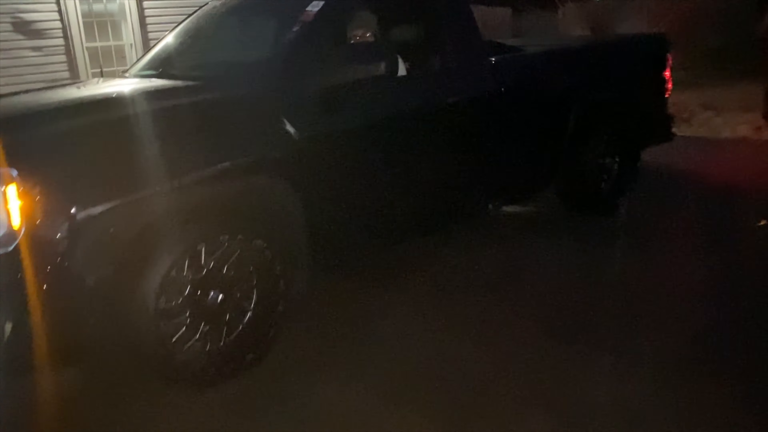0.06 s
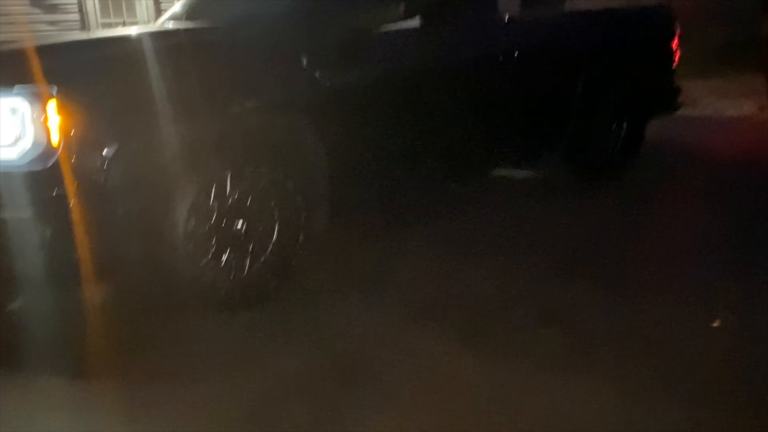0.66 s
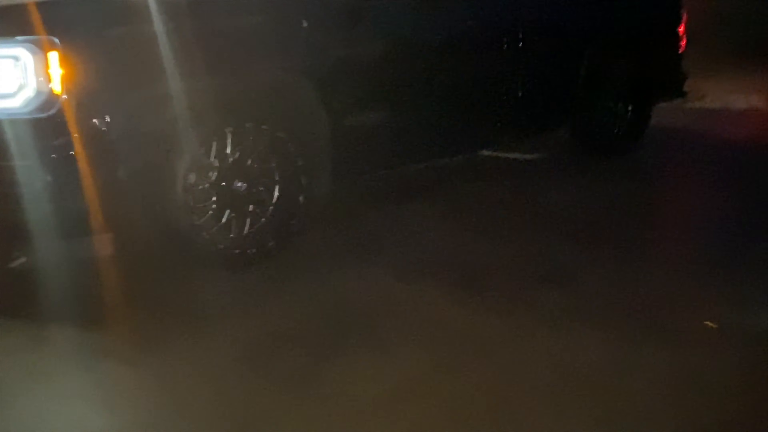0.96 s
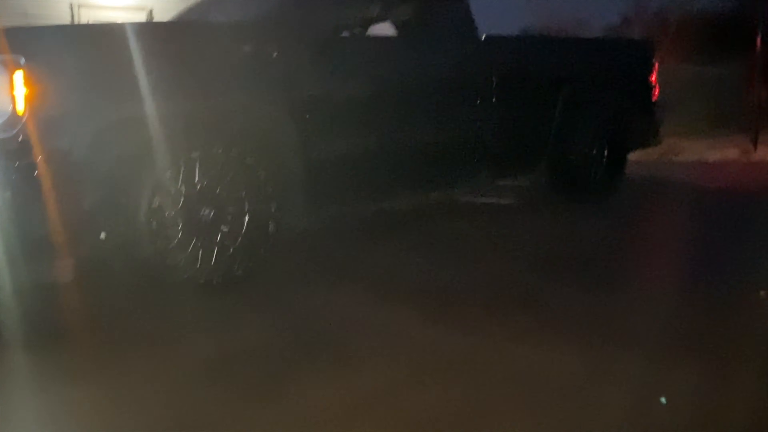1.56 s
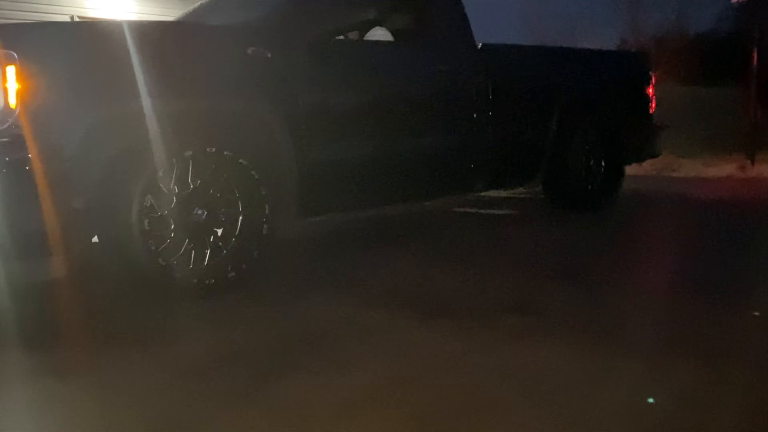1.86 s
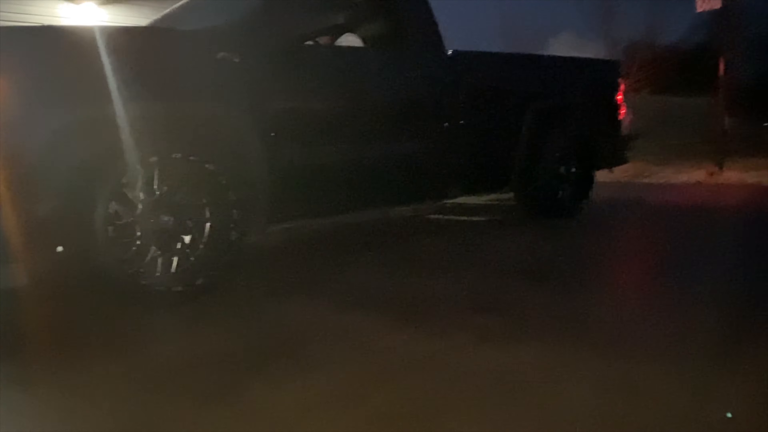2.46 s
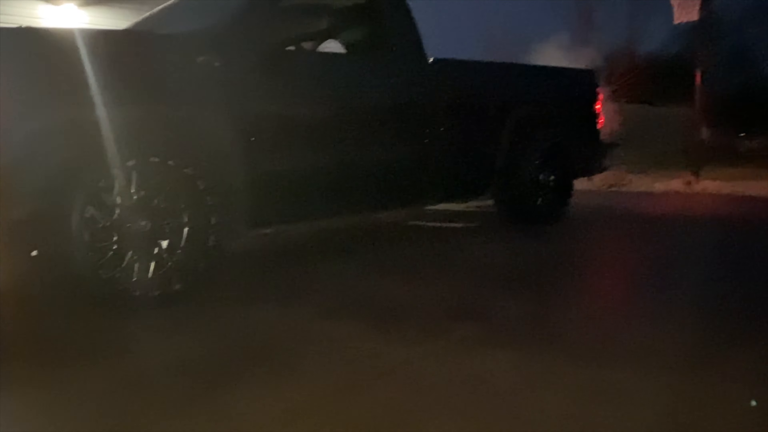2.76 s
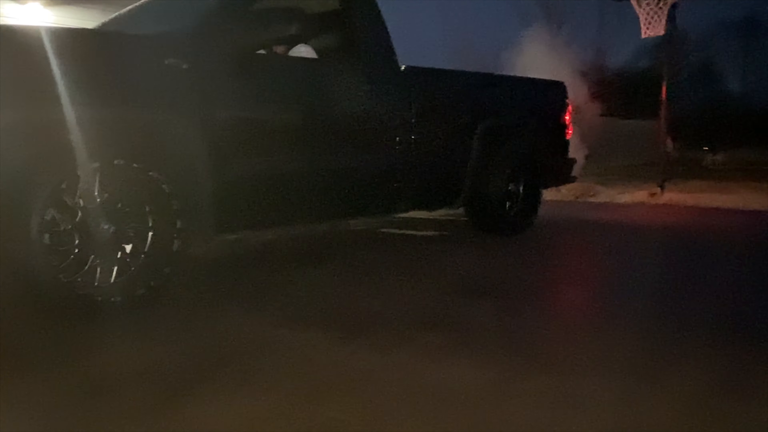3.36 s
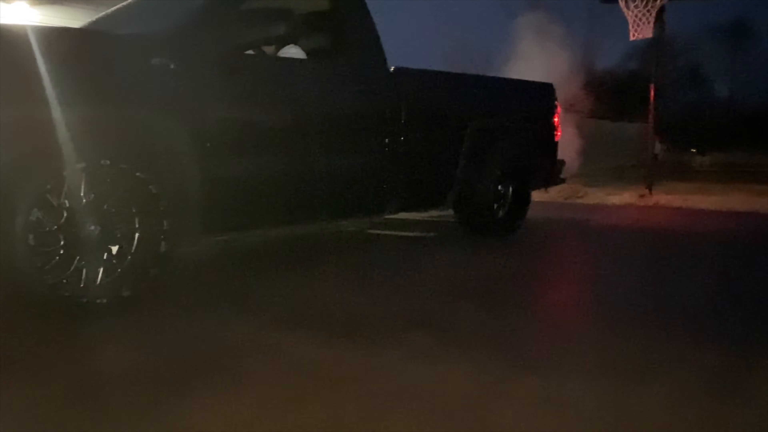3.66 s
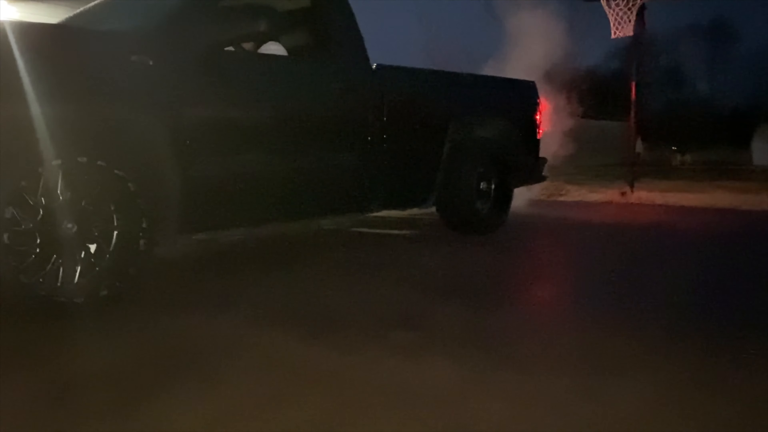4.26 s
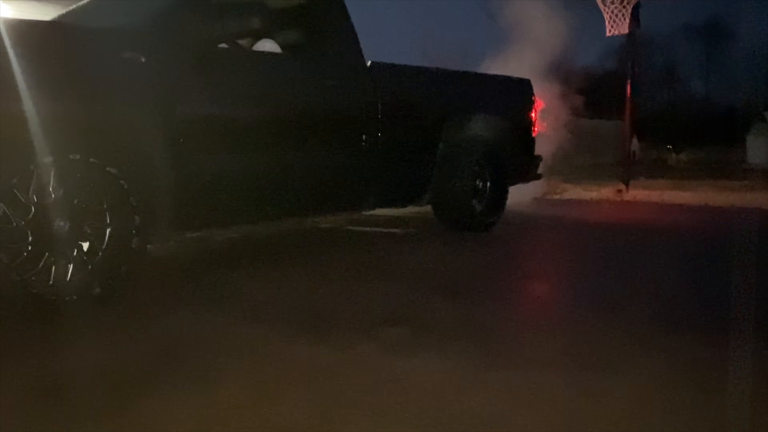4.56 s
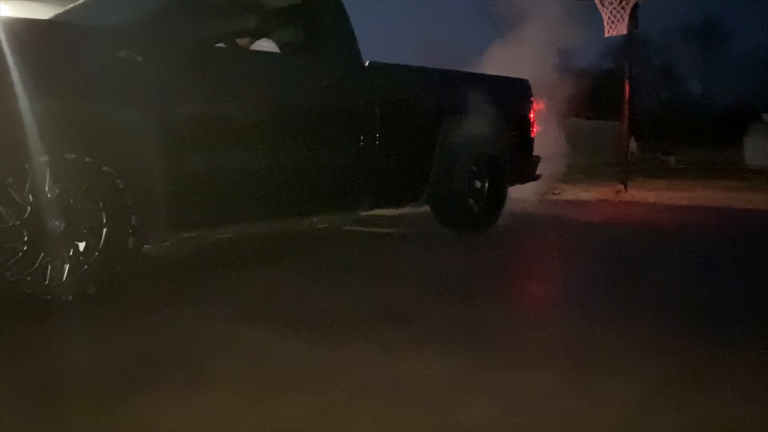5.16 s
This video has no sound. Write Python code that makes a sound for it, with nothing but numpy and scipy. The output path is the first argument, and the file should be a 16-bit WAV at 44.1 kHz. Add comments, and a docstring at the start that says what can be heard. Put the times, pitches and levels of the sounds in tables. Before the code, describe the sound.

A V8 pickup spins its wheels on wet pavement a few metres away, outdoors. From the start the exhaust throbs low and unevenly, rising in pitch, with a faint, brief belt whine just before 1 second. By about 2 seconds it has swelled into a loud, steady boom. Underneath, the tyres scrub and hiss through water, with scattered small ticks of grit and drops. Between 3.2 and 3.5 seconds the rubber gives several quick, high chirps, while the engine climbs to a full roar and the spray grows louder. At about 3.9 seconds the throttle lifts and a loud, high, fluttering tyre squeal cuts in with a light echo. It continues until the end at about 5.3 seconds, sinking slightly in pitch and growing harsher. The engine runs on more softly beneath it, its revs sagging after 4.4 seconds.

```python
"""Wet pavement by a house: a V8 pickup does a burnout a few metres away.
Uneven cylinders pulse through the exhaust pipe: it throbs, settles into a boom and roars as the revs
climb. Under it, gas rushes, a belt drive whines briefly and the spinning tyres scour the ground,
flinging water and grit. Then the rubber bites, sticking and slipping in a few chirps and a long
fluttering squeal, while the driver lifts off and the engine runs on with a softer note."""
import sys
import numpy as np
from scipy import signal
from scipy.fft import rfft, irfft
from scipy.io import wavfile
from scipy.ndimage import uniform_filter1d, minimum_filter1d

SR = 44100
rng = np.random.default_rng(int(sys.argv[2]) if len(sys.argv) > 2 else 0)


def wrap_up_sound(samples):
    """Save the sound to the file named by the first command line argument, as 16-bit audio."""
    columns = np.atleast_2d(samples).T
    # keep every value between -1 and 1, then stretch to whole-number steps
    tamed = np.clip(columns, -1, 1)
    steps = np.round(tamed * 32767).astype(np.int16)
    wavfile.write(sys.argv[1], SR, steps)


N = 233994
T = np.arange(N) / SR
HZ = np.fft.rfftfreq(N, 1 / SR)


def gain_of(db):
    """Decibels to amplitude."""
    return 10 ** (np.asarray(db) / 20)


def unit_rms(x):
    """Scales to rms 1."""
    return x / np.sqrt(np.mean(abs(x) ** 2) + 1e-20)


def follow(table, t=T):
    """The columns of an automation curve at the times t."""
    times, *columns = np.transpose(table)
    return [np.interp(t, times, column) for column in columns]


def ramp(start_s, length_s, t=T):
    """A linear fade from 0 to 1."""
    return np.clip((t - start_s) / length_s, 0, 1)


def arch(middle_s, length_s):
    """A round hump of height 1."""
    return np.sqrt(np.maximum(1 - (2 * (T - middle_s) / length_s) ** 2, 0))


def curve_db(points, hz):
    """An EQ curve read on a log-frequency axis."""
    freqs, db = np.transpose(points)
    return np.interp(np.log(hz + 1), np.log(freqs + 1), db)


def resonance_db(resonances, hz):
    """The boost or cut that a set of resonances gives at hz."""
    return sum(db / (1 + (2 * (hz - centre) / width) ** 2) for centre, width, db in resonances)


def wander(rate_hz, t=T):
    """A complex random modulator of rms 1, rolling off above rate_hz."""
    knots = np.arange(-1, 7, 1 / 1000)
    noise = rng.standard_normal((len(knots), 2)) @ [1, 1j]
    rolloff = 1 + (np.fft.fftfreq(len(knots), 1 / 1000) / rate_hz) ** 2
    return np.interp(t, knots, unit_rms(np.fft.ifft(np.fft.fft(noise) / rolloff)))


def add(mix, start_s, sound):
    """Mixes a sound in at start_s."""
    part = mix[round(start_s * SR):][:len(sound)]
    part += sound[:len(part)]


def stereo_noise(spectrum_db, band_hz, correlation):
    """Coloured stereo noise whose mid signal has rms 1 inside the band."""
    mid, side = rfft(rng.standard_normal((2, N))) * gain_of(spectrum_db)
    band_rms = np.std(irfft(mid * (HZ > band_hz[0]) * (HZ < band_hz[1]), N))
    side = side * np.sqrt((1 - correlation) / (1 + correlation))
    return irfft(np.array([mid + side, mid - side]), N) / band_rms


def pan(x, lead_s, balance_db):
    """Places a sound: the left channel leads the right by lead_s and is balance_db above it."""
    left = np.exp(1j * np.pi * HZ * lead_s) * gain_of(balance_db / 2)
    return irfft(rfft(x) * np.array([left, 1 / left]), N)


# The rev curve, eight firings to an engine cycle: (time [s], firing rate [Hz])
REVS = [(0.0, 71.2), (0.2, 77.3), (0.4, 83.2), (0.6, 88.4), (0.78, 92.8), (1.05, 96.0), (1.3, 100.7),
        (1.6, 104.2), (1.8, 111.4), (2.05, 118.8), (2.41, 117.6), (2.9, 119.4), (3.15, 127.3), (3.4, 129.0),
        (3.55, 137.0), (3.68, 145.4), (3.82, 156.4), (3.95, 161.7), (4.12, 167.6), (4.34, 170.5),
        (4.5, 165.0), (4.71, 155.8), (4.9, 153.1), (5.1, 150.3), (5.31, 150.2)]
FLOOR_IT, LIFT_OFF = (3, 0.43), (3.935, 0.017)  # pedal down, pedal up: (start [s], length [s])


def firing_hz(t=T):
    """Cylinder firings per second."""
    return follow(REVS, t)[0]


def cycles():
    """The running count of engine cycles, starting part-way through one."""
    return 0.078 + np.cumsum(firing_hz()) / 8 / SR


def pull(t=T):
    """0 while the engine lugs, 1 once the revs are up and it pulls hard."""
    return np.clip((firing_hz(t) - 100) / 18, 0, 1)


def yard_echo(x, t60=1.0, taps_per_s=2000):
    """Thin scattered echoes from the house and the ground."""
    t = np.arange(SR // 2) / SR
    taps = rng.standard_normal((2, len(t))) * (rng.random((2, len(t))) < taps_per_s / SR)
    taps *= gain_of(-60 * t / t60) * (t > .006)  # decay and pre-delay
    taps /= np.linalg.norm(taps, axis=1, keepdims=True)
    return signal.fftconvolve(x, taps, axes=1)[:, :N]


def belt_whine(peak_s=0.85, peak_db=-39.5, fade_db_per_s=53, order=90):
    """A belt-driven rotor sings briefly at a high multiple of the engine's cycle rate."""
    phase = 2 * np.pi * order * cycles() + 0.23 * wander(15).real
    return gain_of(peak_db - fade_db_per_s * abs(T - peak_s)) * np.sin(phase)


# The dark colour of rushing exhaust gas: (frequency [Hz], level [dB])
GAS_EQ = [(30, -21), (70, -1), (150, 11.5), (300, 6), (450, 3), (600, -0.5), (800, -0.5), (1200, -7.5),
          (1700, -7.5), (2400, -18), (3500, -50)]
# Hollow ringing peaks that come up under load: (frequency [Hz], width [Hz], boost [dB])
LOAD_HOLLOWS = [(299, 66, 3), (438, 37, 3), (525, 81, 2.5), (650, 30, 4.5), (780, 45, 3), (900, 25, 4),
                (993, 26, 11), (1090, 70, -3), (1210, 42, 11), (1268, 30, 7), (1530, 130, -5),
                (1680, 70, 3), (1912, 42, 9), (2060, 90, -3), (2215, 110, 7), (3350, 200, 2),
                (3940, 140, 3.5), (4220, 140, 5)]


def gas_rush(level_db=-31, full_at_hz=150, db_per_octave=16, lift_off_db=-18, flicker_db=2.0):
    """Turbulent gas puffs with each firing and cycle, swells with the revs and drops on lift-off."""
    angle = 2 * np.pi * cycles()
    puffs = unit_rms(1 + 0.22 * np.cos(8 * angle) + 0.14 * np.cos(angle) + 0.041 * np.cos(3 * angle))
    colour = curve_db(GAS_EQ, HZ) + resonance_db(LOAD_HOLLOWS, HZ)
    rush = stereo_noise(colour, band_hz=(750, 1150), correlation=0.55)
    octaves = np.minimum(np.log2(firing_hz() / full_at_hz), 0)
    db = level_db + db_per_octave * octaves + lift_off_db * ramp(*LIFT_OFF)
    return rush * puffs * gain_of(db + flicker_db * wander(20).real)


# Faders for the spinning tyres: (time [s], scrub level before trim [dB], spray level [dB])
TYRE_FADERS = [(0, -49.5, -48), (.65, -47, -44), (1.55, -46, -40.5), (1.95, -37, -35.5), (2.7, -39, -36.5),
               (3.45, -26.5, -31.5), (3.93, -31.5, -37), (3.98, -39.5, -45.5), (5.31, -43.5, -47)]
# The colour of tread on wet pavement: (frequency [Hz], level [dB])
SCRUB_EQ = [(600, -3), (1200, 7.5), (1500, 3), (2200, 4), (3000, 4.5), (4100, 0), (5200, -1.5),
            (9000, -12.5)]
# The ring of thin metal body panels: (frequency [Hz], width [Hz], boost [dB])
BODY_PANELS = [(930, 60, 4), (1060, 70, 5), (1220, 50, 3), (1440, 90, 4), (1750, 450, -4), (1900, 70, 2),
               (2300, 160, 3), (3240, 90, 6), (3600, 130, 4), (4180, 150, 3)]


def tyre_scrub(trim_db=-5.5, flicker_db=1.5):
    """Tread blocks scour the pavement; under power it rings with hollow peaks, otherwise the panels ring."""
    colour, band_hz = curve_db(SCRUB_EQ, HZ), (1900, 2600)
    hollow = stereo_noise(colour + resonance_db(LOAD_HOLLOWS, HZ), band_hz, correlation=0.42)
    panels = stereo_noise(colour + resonance_db(BODY_PANELS, HZ), band_hz, correlation=0.42)
    driven = pull() * (1 - ramp(*LIFT_OFF))
    rush = np.sqrt(driven) * hollow + np.sqrt(1 - driven) * panels
    patter = unit_rms(1 + 0.021 * np.cos(2 * np.pi * 4 * cycles()))
    db = follow(TYRE_FADERS)[0] + trim_db + flicker_db * wander(8).real
    return pan(rush, lead_s=2e-5, balance_db=2.5) * patter * gain_of(db)


# The hiss of flung drops: (frequency [Hz], level [dB])
SPRAY_EQ = [(1500, -20), (3000, -6), (4200, 0), (5300, -1.5), (7000, 5.5), (8500, 1), (16000, 1.5)]
# The airy top of fine mist: (frequency [Hz], level [dB])
MIST_EQ = [(7000, -30), (10000, -3), (15000, 0)]


def water_spray(mist_from_db=-42, mist_share=.7, flicker_db=1.75):
    """Water flies off the tyres; a strong spray breaks into brighter mist."""
    db, band_hz = follow(TYRE_FADERS)[1], (5000, 16000)
    drops = stereo_noise(curve_db(SPRAY_EQ, HZ), band_hz, correlation=.8)
    mist = stereo_noise(curve_db(MIST_EQ, HZ), band_hz, correlation=.8)
    misting = np.clip((db - mist_from_db) / 5, 0, 1)
    hiss = pan(drops + mist_share * misting * mist, lead_s=2.2e-5, balance_db=.3)
    return hiss * gain_of(db + flicker_db * wander(150).real)


# Grit and water hitting the body: (time [s], relative level [dB], brightness [0-1])
GRIT_HITS = [(.09, -44, 0.4), (0.229, -35.5, 0.4), (.498, -34, 0.9), (.532, -37, 0.8), (.572, -35.5, 0.8),
             (0.609, -31, 0.8), (.655, -39, 0.8), (.70, -37, 1), (0.784, -34, .15), (1.042, -35, 0.05),
             (1.098, -31, 0), (1.227, -32, 0.1), (1.505, -29.5, 0.07), (1.583, -29, 0), (1.85, -29, 1),
             (2.025, -32, 0.4), (2.367, -22, 0.7), (2.436, -23.5, 0.4), (2.812, -23.5, 0.2),
             (2.996, -23.5, 0.56), (3.641, -15, 0.13)]
# The colours of stones and of water: (frequency [Hz], level [dB])
STONE_EQ = [(300, -21), (1200, 14), (2500, 11), (3800, 7.5), (6000, -27), (12000, -32)]
WATER_EQ = [(500, 12), (1500, -2), (3500, -1), (6500, 4), (8000, -1), (12000, -41)]


def grit(t60=0.052, attack_s=0.0059, trim_db=6.5):
    """Short grainy bursts against the body: stones crackle, water ticks brighter."""
    t = np.arange(SR // 8) / SR
    stone_envelope, water_envelope = np.zeros((2, N))
    for start_s, db, brightness in GRIT_HITS:
        burst = gain_of(db - 60 * t / t60) * (1 - np.exp(-t / attack_s))
        add(stone_envelope, start_s, np.sqrt(1 - brightness) * burst)
        add(water_envelope, start_s, np.sqrt(brightness) * burst)
    stones = stereo_noise(curve_db(STONE_EQ, HZ), band_hz=(500, 16000), correlation=0.6)
    water = stereo_noise(curve_db(WATER_EQ, HZ), band_hz=(500, 16000), correlation=0.28)
    grains = unit_rms(gain_of(3.5 * wander(250).real))
    return (stones * stone_envelope + water * water_envelope) * grains * gain_of(trim_db)


# The engine's voicing in four states, as relative levels:
# (order [multiple of the cycle rate], lugging [dB], pulling hard [dB], floored [dB], eased off [dB])
ORDER_VOICING = [(3, -20, -1, -7, -4), (4, -11, -38, -36, -22), (5, -3, -1, -1, 1), (6, -12, -23, -10, 1),
                 (7, -24, -10, 0, 3), (8, 0, 0, 0, 0), (9, -4, 2, 0, -3), (10, 5, 6, -1, 11),
                 (11, 8, 0, 14, 17), (12, -1, -1, 0, 3), (13, 5, -1, 12, 10), (14, 10, 7, -5, 3),
                 (15, 9, 1, 3, 3), (16, 8, 3, 11, 15), (17, 8, -1, 8, 0), (18, -2, 2, 0, -2),
                 (19, 9, 6, 10, 4), (20, 4, -3, -6, 7), (21, -4, -2, 5, 2), (22, 4, 0, -7, -4),
                 (23, 4, 1, 1, 1), (24, -2, 0, 7, 5), (25, -3, 2, 4, -2), (26, -3, -4, 1, 0),
                 (27, 0, -12, 3, 1), (28, -5, -18, -5, -4), (29, 6, -2, -3, -2), (30, -2, -4, -7, -3),
                 (31, -6, -6, -5, -1), (32, -6, -6, 6, 0), (33, -5, -8, 2, -7), (34, -4, -1, -4, -4),
                 (35, -5, -5, 2, 1), (36, -16, -5, -16, -13), (37, -10, -12, -5, -6), (38, -11, -7, -8, -6),
                 (39, -10, -15, -10, -9), (40, -12, -12, -6, -4), (41, -12, -6, -13, -18),
                 (42, -15, -3, -12, -14), (43, -16, -9, -2, -14), (44, -17, -7, -15, -8),
                 (45, -17, -7, -8, -10), (46, -20, -7, -8, -12)]


def voicing_db(orders, t):
    """Uneven cylinders give each order its own level, crossfaded as the engine changes state."""
    pulling, floored, eased = pull(t), ramp(*FLOOR_IT, t), ramp(*LIFT_OFF, t)
    states = np.array([1 - pulling, pulling * (1 - floored), floored * (1 - eased), eased])
    listed = np.array(ORDER_VOICING)[:, 1:] @ states
    # above the table the orders roll off, and the uneven firing of the two banks favours some
    high = orders[len(ORDER_VOICING):]
    base_db = (-22, -14, -14, -20) @ states
    db_per_octave = (-18, -6, -6, -12) @ states
    favour_db = ((4, 3, 6, 6) @ states) * np.isin(high % 8, (0, 3, 5))
    return np.vstack([listed, base_db + db_per_octave * np.log2(high / high[0]) + favour_db])


# Exhaust pipe resonances: (frequency [Hz], width [Hz], boost [dB])
PIPE_MODES = [(63.3, 23, 20), (108.4, 61.2, 21.5), (179.4, 17.9, 14), (207.4, 41, 6.5), (237.4, 11, 6.5),
              (274.2, 24.5, 12.5), (298.7, 26, 11), (336, 13, -10.5), (380, 22, -1.8), (426.8, 41, 15.5),
              (554, 32, 10.5), (649.6, 33, 9.5), (796, 24, 4)]


def pipe_response(hz, firing, upper_from_hz=200):
    """The pipe's boost [dB] and phase turn [rad]; at low revs its upper resonances ring weakly."""
    upper_share = curve_db([(80, .55), (112, 1)], firing)  # (firing rate [Hz], share of boost [0-1])
    ringing = 1 - (1 - upper_share) * np.clip((hz - upper_from_hz) / 10 + .5, 0, 1)
    response = sum(db / (1 + 2j * (hz - centre) / width) for centre, width, db in PIPE_MODES)
    return resonance_db(PIPE_MODES, hz) * ringing, np.log(10) / 20 * response.imag


# Two hard firings: (place in the cycle [0-1], extra strength [ratio])
HARD_FIRINGS = [(.02, .55), (.39, .4)]


def lope(width_cycles=.1):
    """A lugging engine chugs twice a cycle, until the revs smooth it out."""
    chugs = sum(strength * np.exp(-(((cycles() - place + .5) % 1 - .5) / width_cycles) ** 2)
                for place, strength in HARD_FIRINGS)
    swell = 1 + np.interp(firing_hz(), (80, 91, 96, 105), (0, 1, 1, 0)) * chugs
    return swell / np.sqrt(uniform_filter1d(swell ** 2, size=8000))


# The eight cylinders in firing order: (pulse strength [ratio], lateness [firings])
CYLINDER_PULSES = [(.85, .06), (.44, .05), (.67, .13), (.84, .11), (.59, -.22), (.65, .13), (.59, -.18),
                   (.48, .12)]
# The throttle's drive and bite: (time [s], level [dB], tilt above order 12 [dB/octave])
THROTTLE_DRIVE = [(0.0, -47.5, 4), (0.6, -42, 0), (1.3, -42.7, -.7), (2.8, -42.5, 0.3), (3.0, -40.5, 2),
                  (3.38, -43.5, 5), (3.46, -41.5, 7), (3.7, -40, 5.5), (3.9, -38, 1.2), (4.5, -39.5, 0),
                  (4.8, -38.5, 2), (5.3, -40.5, 6.5)]
# The firing note booms in the pipe's main resonance: (firing rate [Hz], level [dB])
FIRING_BOOM = [(75, -51), (84, -46), (93, -24.5), (100, -13), (111, -4.5), (122, -3.5), (136, -6),
               (150, -7.5), (155, -16.5), (167, -10)]


def exhaust(top_order=72, lift_off_db=-12.5, boom_lift_off_db=-8.5):
    """Orders of the engine cycle sweep through the pipe's resonances; order 8 is the firing note."""
    t = np.arange(0, T[-1] + .01, 1 / 200)  # control rate
    orders = np.arange(ORDER_VOICING[0][0], top_order + 1)[:, None]
    firing, eased = firing_hz(t), ramp(*LIFT_OFF, t)
    drive_db, tilt = follow(THROTTLE_DRIVE, t)
    bite_db = tilt * np.log2(np.maximum(orders / 12, 1))
    pipe_db, pipe_phase = pipe_response(orders * firing / 8, firing)
    levels_db = voicing_db(orders, t) + drive_db + lift_off_db * eased + bite_db + pipe_db
    boom_db = curve_db(FIRING_BOOM, firing) + boom_lift_off_db * eased
    levels_db = np.where(orders == 8, boom_db, levels_db)
    # the cylinder pulses set each order's phase, and the pipe turns it
    strength, lateness = np.transpose(CYLINDER_PULSES)
    pulses = np.exp(-2j * np.pi * orders * (np.arange(8) + lateness) / 8) @ strength
    phases = np.angle(pulses)[:, None] + pipe_phase
    # the charges burn unevenly: at part throttle, floored, eased off
    roughness = np.interp(ramp(*FLOOR_IT, t) + eased, (0, 1, 2), (.09, .08, .05))
    angle, roar = 2 * np.pi * cycles(), np.zeros(N)
    for order, db, phase in zip(orders[:, 0], levels_db, phases):
        jitter = roughness * (.4 if order == 8 else (order / 16) ** .7)
        envelope = gain_of(db) * np.exp(1j * phase) * (np.sqrt(1 - jitter ** 2) + jitter * wander(5.8, t))
        roar += (np.interp(T, t, envelope) * np.exp(1j * order * angle)).real
    return pan(roar * lope(), lead_s=5e-6, balance_db=-.5)


# First bites of the rubber: (time [s], length [s], pitch [Hz], level [dB])
RUBBER_BITES = [(3.243, 0.02, 1436, -14), (3.289, 0.042, 1496, -24), (3.329, 0.022, 1468, -8.5),
                (3.36, 0.044, 1454, -26), (3.397, 0.022, 1480, -16), (3.409, 0.043, 1474, -11.5),
                (3.48, 0.044, 1550, -21)]


def tyre_chirps(roughness=.3):
    """The rubber catches for an instant at a time, in short ragged tones."""
    chirps = np.zeros(N)
    for start_s, length_s, hz, db in RUBBER_BITES:
        t = np.arange(round(length_s * SR)) / SR
        scuff = (1 + roughness * wander(90, t)) * np.exp(2j * np.pi * hz * t)
        add(chirps, start_s, gain_of(db) * signal.windows.tukey(len(t), .8) * scuff.real)
    return chirps


# The tread grabs and the note turns ragged: (centre time [s], length [s], boost [dB], pitch drop [Hz])
TREAD_GRABS = [(3.955, .055, 11, 75), (4.005, .06, 3, 78), (4.237, .085, 2.5, 32), (4.372, .075, 0, 50),
               (4.392, .016, 4, 0), (4.412, .014, -7, 0), (4.427, .016, 6, 0), (4.485, .06, 2, 8),
               (4.84, .05, 0, 0), (4.9, .08, 0, 28), (4.96, .04, 0, 0), (5.19, .09, -1, 10),
               (5.29, .04, 5.5, 0)]
# The rubber slides evenly: (centre time [s], length [s], calm [0-1], pitch rise [Hz], boost [dB])
EVEN_SLIDES = [(4.06, .06, .4, 20, 0), (4.12, .08, .1, -15, -5), (4.175, .05, .3, 18, 0),
               (4.308, .055, .75, 20, -6), (4.545, .04, .3, 0, 0), (4.665, .15, .3, 0, 2.5),
               (5.045, .07, .7, 8, -1)]


def grip(start_s, start_hz=1592, sag_hz_per_s=116, swell_db_per_s=2.5):
    """Pitch, level and stutter of the squeal: it swells, and sinks in pitch as the wheels slow."""
    hz = start_hz - sag_hz_per_s * (T - start_s)
    db = -15 - swell_db_per_s * (5.5 - T)
    stutter = .72 + .25 * wander(22).real
    for centre_s, length_s, boost_db, drop_hz in TREAD_GRABS:
        grab = arch(centre_s, length_s)
        hz -= drop_hz * grab
        db += boost_db * grab
        stutter += .25 * grab
    for centre_s, length_s, calm, rise_hz, boost_db in EVEN_SLIDES:
        slide = arch(centre_s, length_s)
        hz += rise_hz * slide
        db += boost_db * slide
        stutter *= 1 - calm * slide
    return hz, db, np.clip(stutter, 0, 1.2)


def tyre_squeal(start_s=3.92, attack_s=0.024, beat_hz=67, harsh_db_per_s=1.2):
    """Rubber sticks and slips; passing tread blocks shake the note and a lower slip beats against it."""
    hz, db, stutter = grip(start_s)
    tread_phase = 2 * np.pi * np.cumsum(firing_hz() / 2 + 10 * wander(11.4).real) / SR
    downshift = np.exp(-2j * np.pi * np.cumsum(beat_hz + 22 * wander(30).real) / SR)
    shake = np.exp(0.42j * stutter * np.cos(tread_phase))
    lower_slip = (.8 + .55 * wander(74)) * downshift
    noise_skirt = 2 * gain_of(-17) * wander(210)
    flutter = shake + stutter * (lower_slip + noise_skirt)
    flutter /= np.sqrt(uniform_filter1d(abs(flutter) ** 2, size=1500))  # tyre load holds the mean level
    note = flutter * np.exp(2j * np.pi * np.cumsum(hz + 6 * wander(20.4).real) / SR)
    # the sawtooth of stick and slip adds overtones, which grow as the rubber heats
    second = gain_of(-17) * note ** 2 / np.sqrt(abs(note) + .1) * (1 + 0.24 * stutter * downshift)
    third = gain_of(-30) * note ** 3 * downshift ** 2 / (abs(note) + 0.22)
    heat = gain_of(harsh_db_per_s * np.maximum(T - start_s, 0))
    tone = note + (second + third) * heat
    return np.sqrt(2) * tone.real * gain_of(db) * ramp(start_s, attack_s)


def scene():
    """Engine and tyres with their echoes, over a dry bed of whine, gas, scrub and spray."""
    tyres = pan(tyre_squeal() + tyre_chirps(), lead_s=5e-5, balance_db=1.0) + grit()
    engine = exhaust()
    echoes = gain_of(-9.5) * yard_echo(tyres) + gain_of(-25) * yard_echo(engine)
    bed = belt_whine() + gas_rush() + tyre_scrub() + water_spray()
    return bed + echoes + engine + tyres


def record(dry):
    """A limiter eases the highest peaks down, then a steep low-pass trims the top."""
    ceiling, cutoff_hz = .95, 15900
    gain = ceiling / np.maximum(abs(dry).max(0), ceiling)
    limited = dry * uniform_filter1d(minimum_filter1d(gain, size=301), size=301)
    lowpass = signal.firwin(511, cutoff_hz, window=("kaiser", 9), fs=SR)
    return signal.oaconvolve(limited, lowpass[None], "same")


dry = scene()
out = record(dry)
wrap_up_sound(out)
```